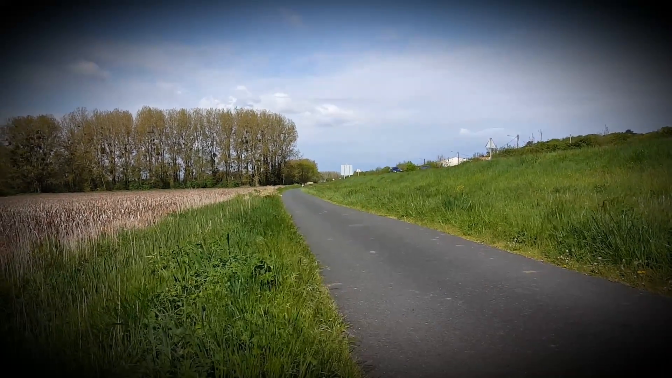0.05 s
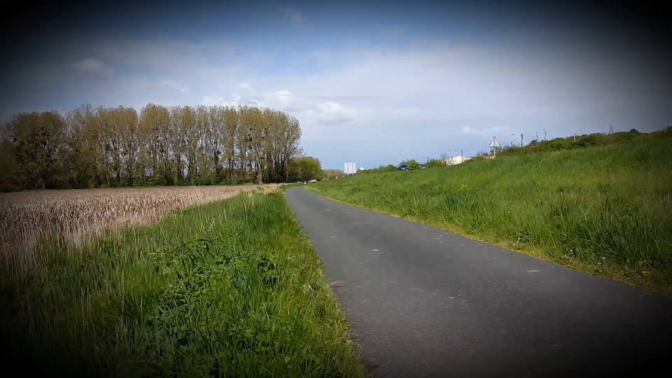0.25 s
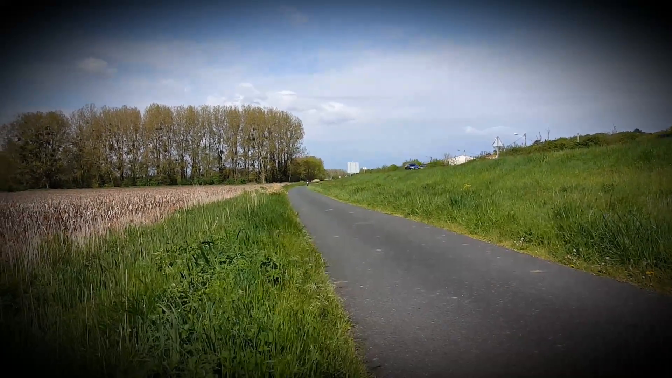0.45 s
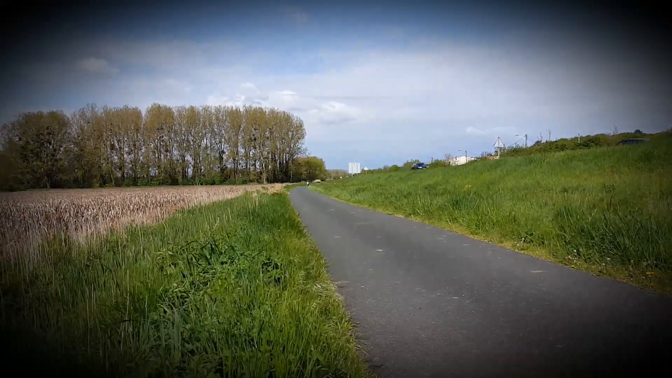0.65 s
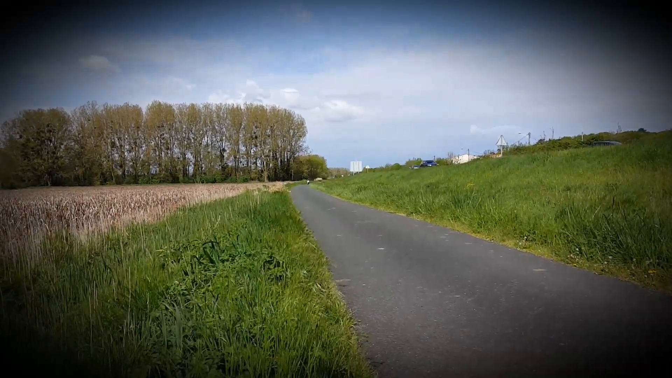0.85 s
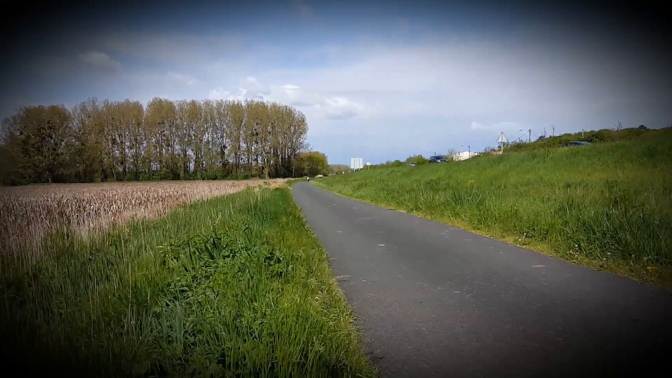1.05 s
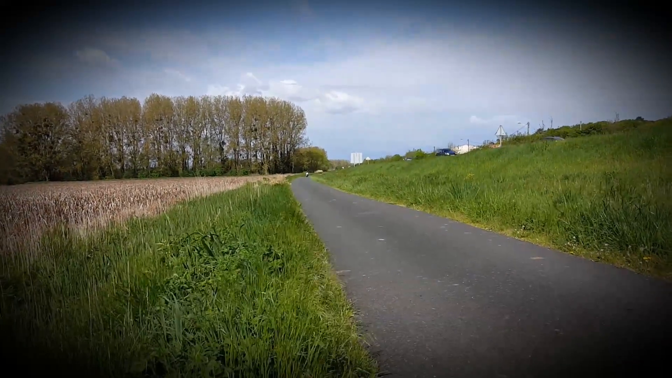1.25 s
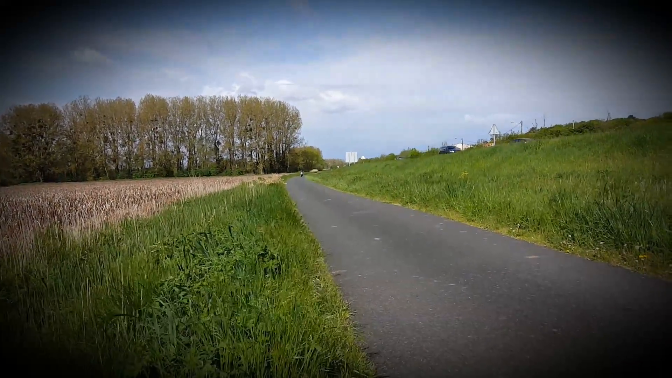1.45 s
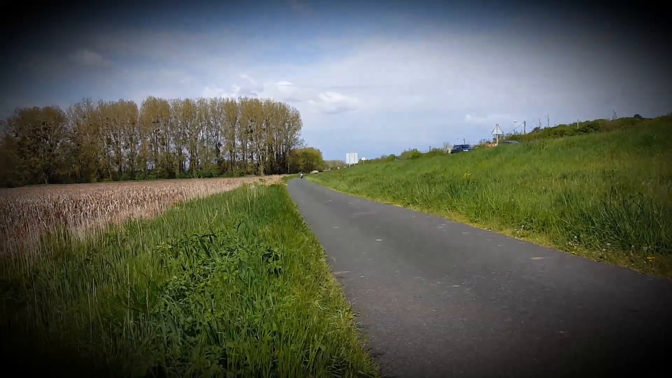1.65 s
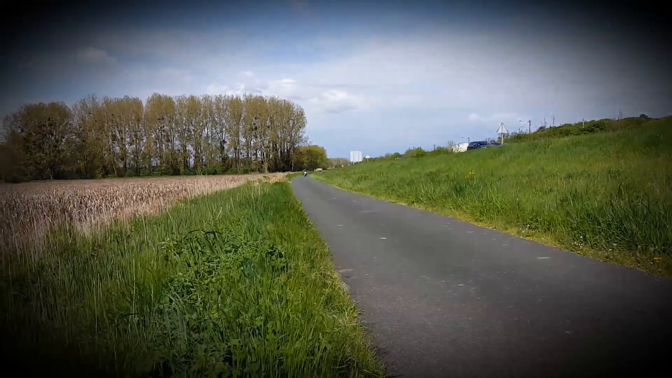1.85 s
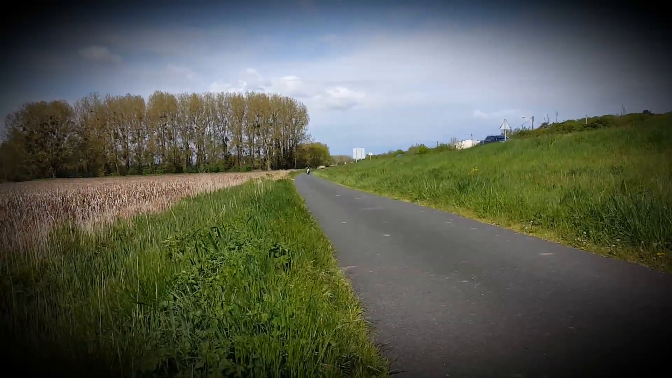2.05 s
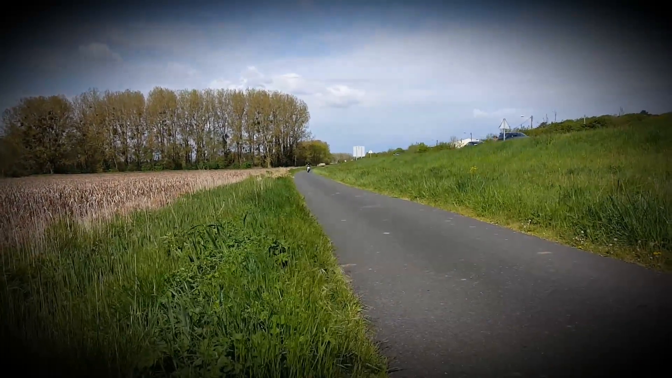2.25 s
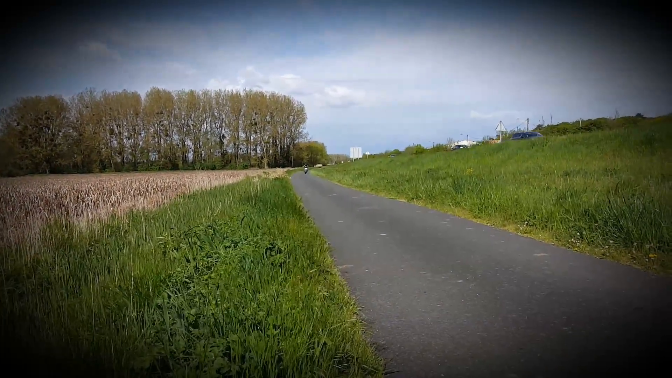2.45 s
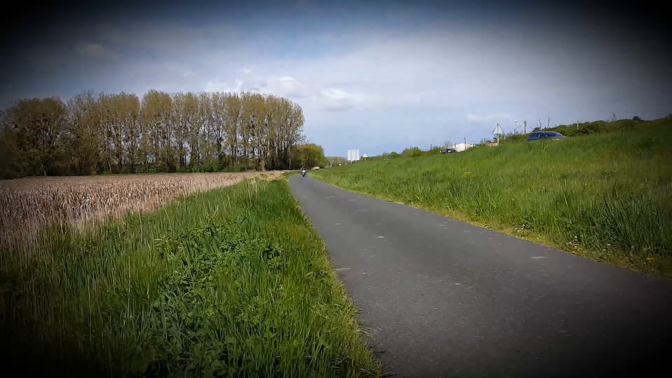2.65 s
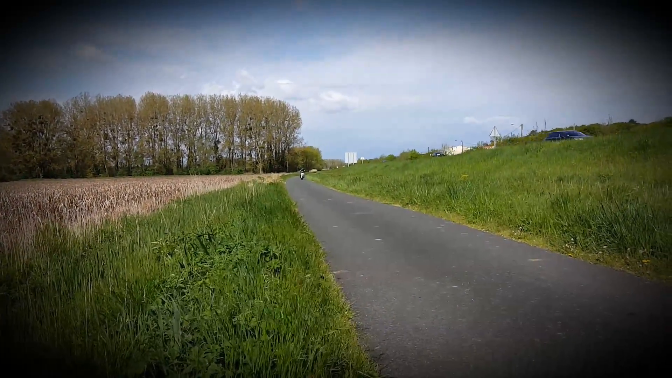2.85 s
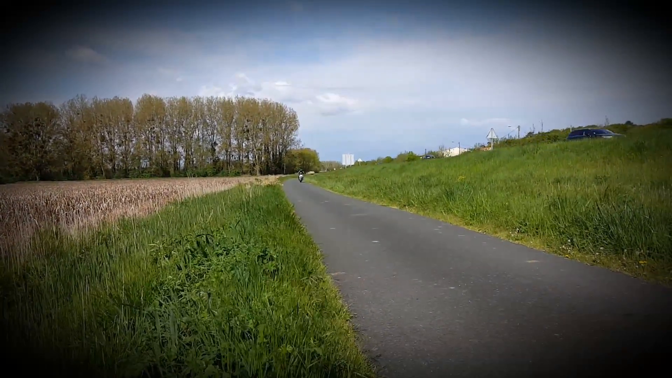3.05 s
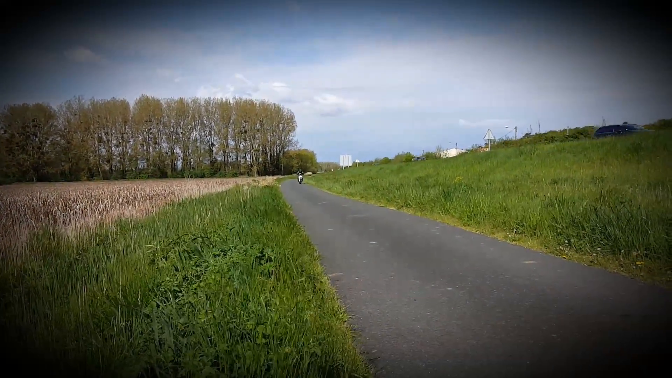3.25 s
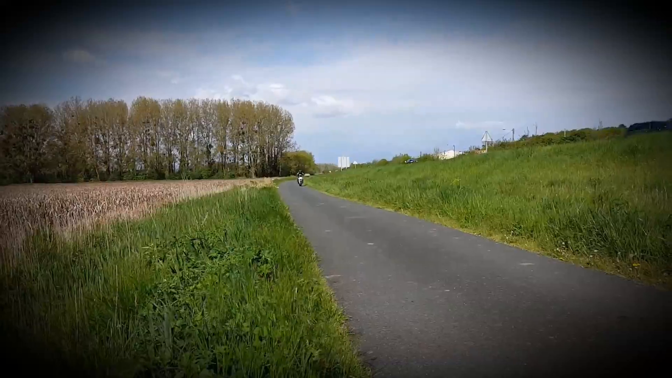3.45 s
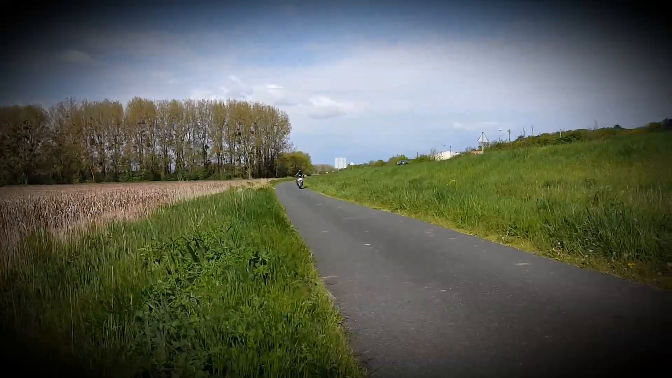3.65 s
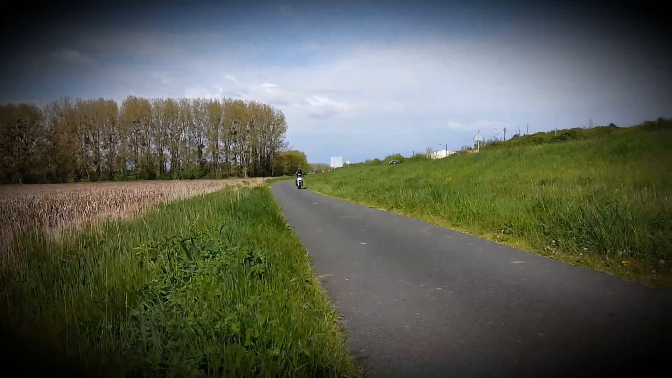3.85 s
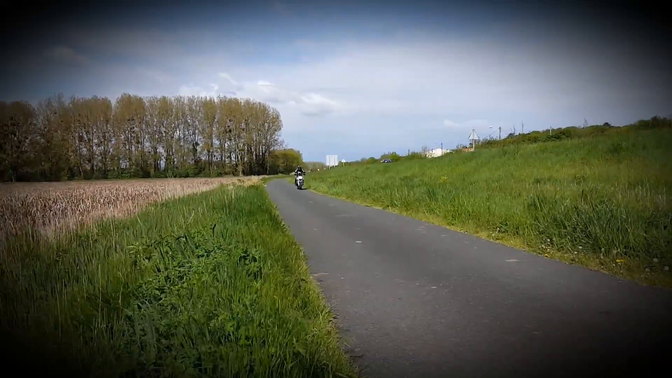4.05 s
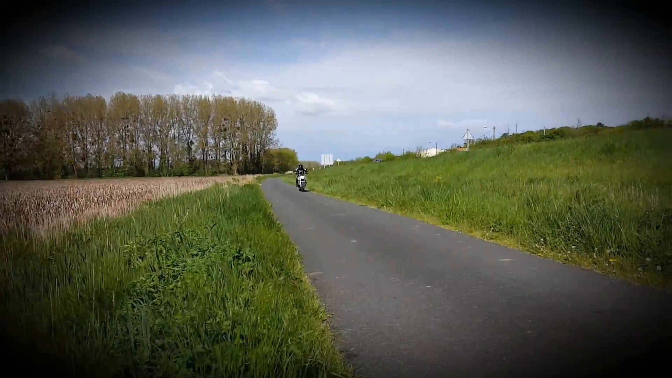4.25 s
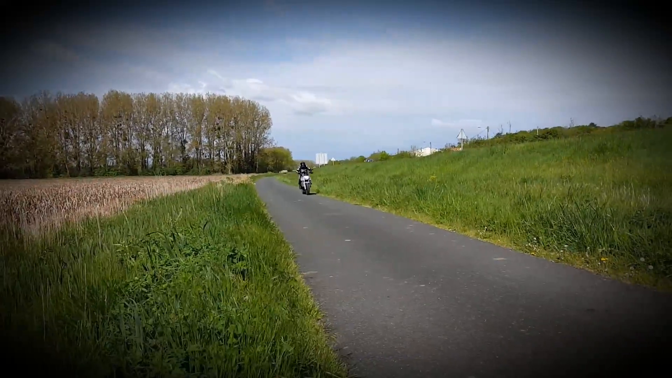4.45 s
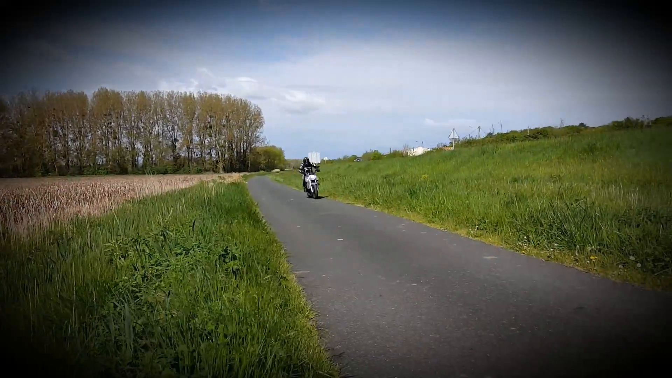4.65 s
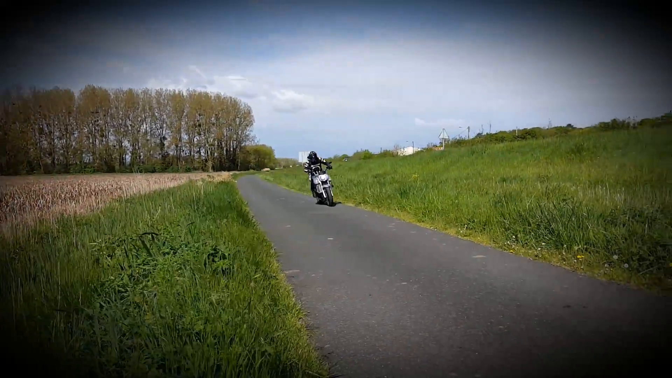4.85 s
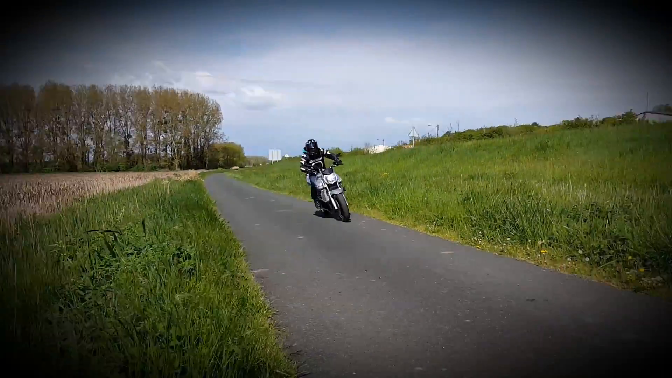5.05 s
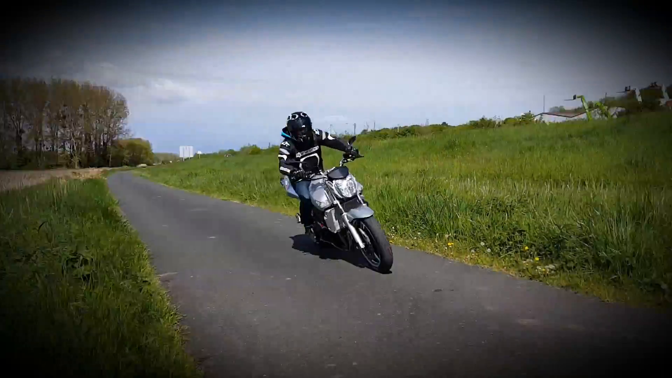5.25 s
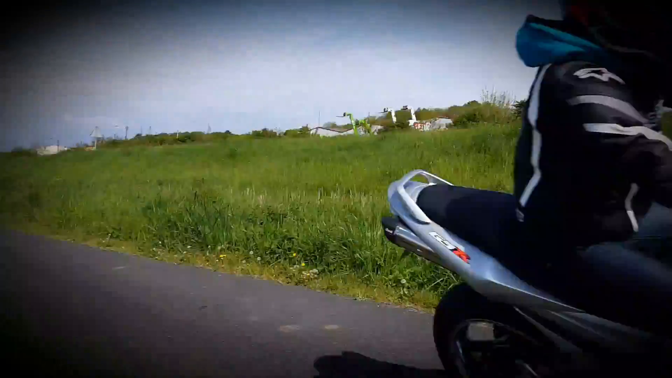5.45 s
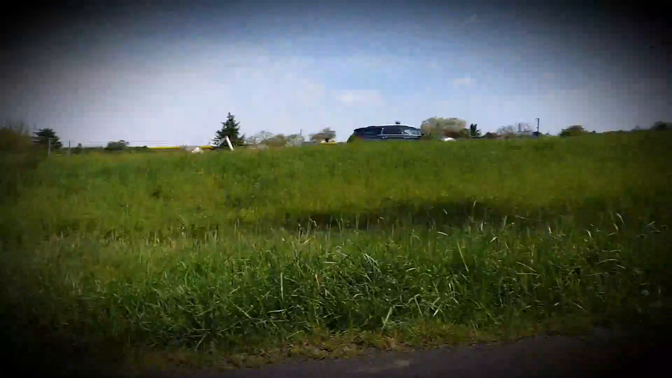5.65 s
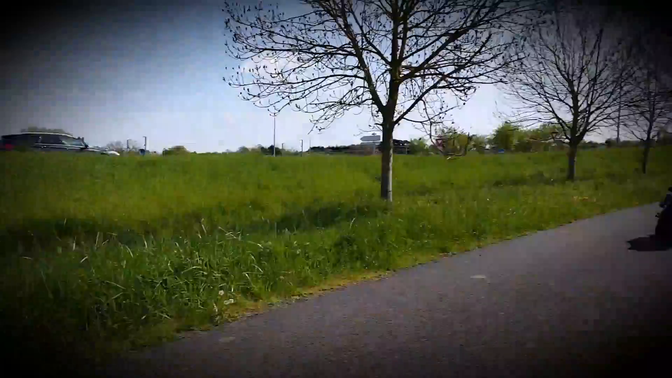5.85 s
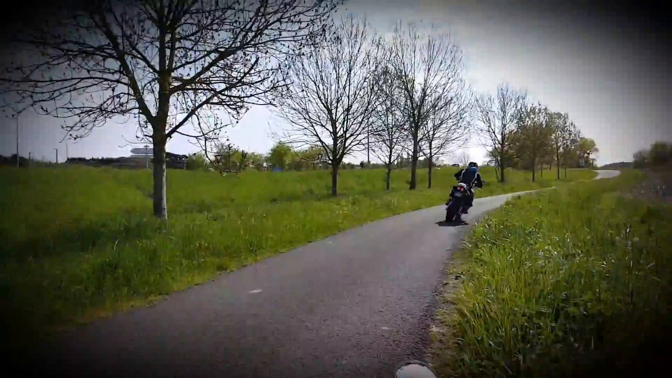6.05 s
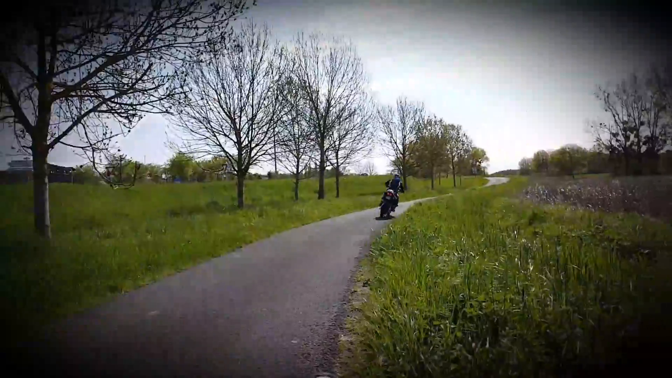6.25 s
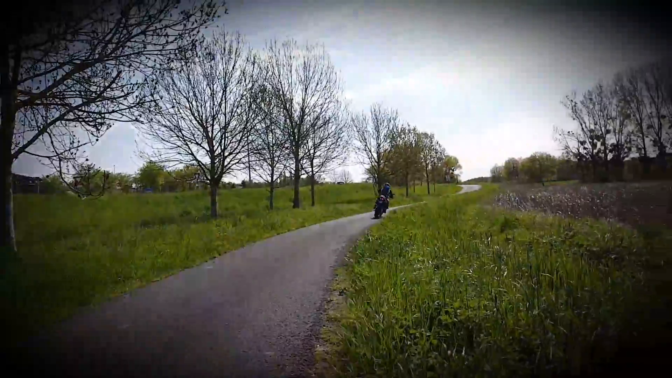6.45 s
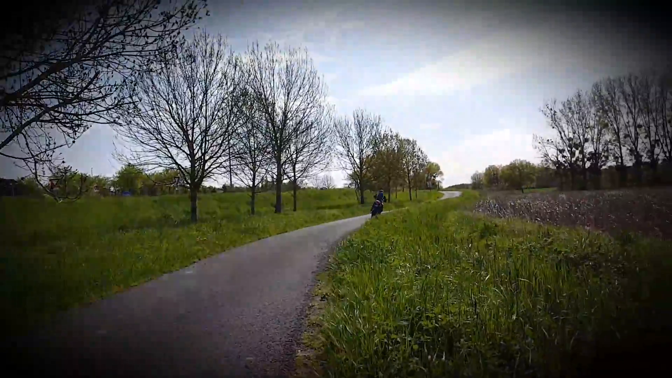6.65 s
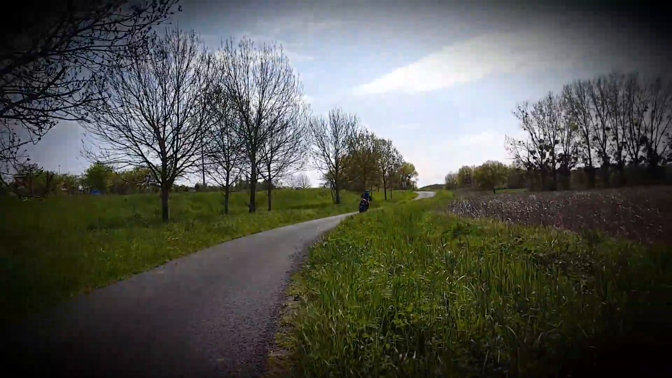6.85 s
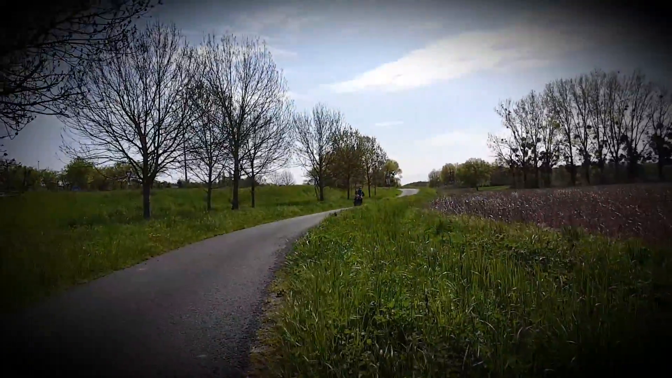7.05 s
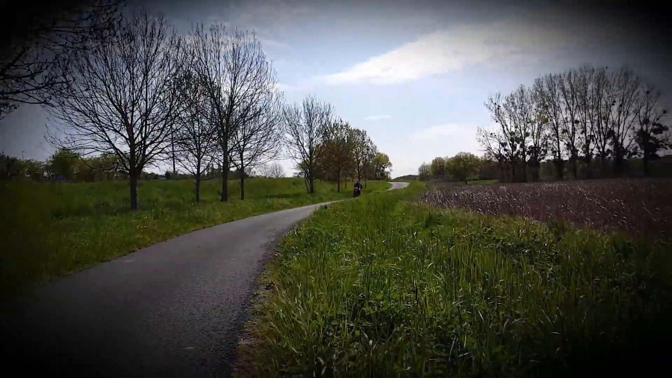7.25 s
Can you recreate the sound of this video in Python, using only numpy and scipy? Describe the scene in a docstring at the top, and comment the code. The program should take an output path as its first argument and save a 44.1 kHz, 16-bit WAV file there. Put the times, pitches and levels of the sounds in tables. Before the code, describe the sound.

Outdoors on a country lane, a camera's stereo microphone picks up faint traffic wash and irregular low wind buffets, with sharper thumps near 0.4-0.7, 1.7-2.0 and 4.1 s and a tiny tap at 0.7 s. A far four-cylinder motorcycle howls upward under full throttle from 0 to 1.3 s, blurred by tree echo. Pitch drops quickly at the upshift, pulls again from 1.5 s, then the throttle eases at 2.0 s. From 3 to 4.8 s the coasting engine nears, its tone sinking while boom, gear whine and hiss grow. Stuttering exhaust pops at 4.8-4.9 s end in one hard bang as it opens up. It roars past very close around 5.5-5.6 s with chain thrash and a snarl, pitch falling. A raspy exhaust blast follows at 5.9-6.2 s, then a receding drone; throttle closes at 6.9 s with soft pops, still humming at 7.3 s.

```python
"""A country lane: a loud four-cylinder motorcycle accelerates far off, shifts up, rolls off, opens the
throttle again, passes close to the camera and rides away, shutting off near the end.
One crankshaft angle drives the exhaust tones, rough combs of firing orders and pulsing noise bands.
A row of trees scatters an echo that counts for more when the bike is far.
Wind buffets the two microphone ports as lumpy noise, over a faint noise wash of distant traffic."""
import sys
import numpy as np
from scipy import signal
from scipy.fft import rfft, irfft, next_fast_len
from scipy.io import wavfile
from scipy.ndimage import uniform_filter1d, minimum_filter1d, map_coordinates

SR = 44100
rng = np.random.default_rng(int(sys.argv[2]) if len(sys.argv) > 2 else 0)


def persist_wave(psi):
    """Save psi, clipped to +-1, as 16-bit WAV."""
    counts = np.round(np.clip(psi, -1, 1) * 32767).astype(np.int16)
    wavfile.write(sys.argv[1], SR, np.atleast_2d(counts).T)


N = 322371
T = np.arange(N) / SR
HZ = np.fft.rfftfreq(N, 1 / SR)
CLOSEST_M = 2  # reference distance for the loudness of the bike's parts
TAIL_ON_S, TURN_S = 5.927, 0.22  # the bike turns its tail to the camera


def amp(db):
    """Decibels to gain."""
    return np.exp(np.asarray(db) * (np.log(10) / 20))


def unit(x):
    """Scales to rms 1."""
    return x / np.sqrt(np.mean(x ** 2) + 1e-20)


def curves(rows):
    """Each column of a table as a curve over the whole time."""
    s, *columns = np.transpose(rows)
    return [np.interp(T, s, column) for column in columns]


def read(points):
    """A spectrum table at every frequency, joined along a log-frequency axis."""
    hz, value = np.transpose(points)
    return np.interp(np.log(HZ + 1), np.log(hz), value)


def weigh(x, gain):
    """Filters with a gain given at every frequency."""
    size = next_fast_len(N + 4000)
    gain_here = np.interp(np.fft.rfftfreq(size, 1 / SR), HZ, gain)
    return irfft(rfft(x, size) * gain_here, size)[..., :N]


def colour(x, spectrum):
    """Gives x a spectrum, at rms 1."""
    return unit(weigh(x, amp(read(spectrum))))


def drift(rate):
    """Smooth chance of rms 1 that changes about rate times a second."""
    knots = rng.standard_normal(8192)
    return unit(np.interp(T * rate, np.arange(len(knots)), knots))


def swell(s, length):
    """A smooth bump of height 1 around time s."""
    return np.exp(-(2 * (T - s) / length) ** 2)


def ramp(s, length):
    """Rises from 0 at time s to 1 a length later."""
    return np.clip((T - s) / length, 0, 1)


def window(start, rise, until, fade):
    """Rises to 1, holds and fades."""
    return ramp(start, rise) - ramp(until, fade)


def pan(db):
    """Gains of the two ports for a left-minus-right level."""
    gains = amp([[db / 2], [-db / 2]])
    return gains / np.sqrt(np.mean(gains ** 2))


def knock(s, db, hz, decay):
    """A pressure push that swells for half the decay time, then dies away."""
    out, t = np.zeros(N), np.arange(SR // 10) / SR
    u = t / (decay / 2)
    push = amp(db) * u * np.exp(1 - u) * np.sin(2 * np.pi * hz * t)
    part = out[round(s * SR):][:len(t)]
    part += push[:len(part)]
    return out


# How alike the ports hear the roar and the traffic: (frequency [Hz], left-right likeness [-1 to 1])
PORT_LIKENESS = [(100, 1), (500, 0.89), (1000, 0.64), (2000, 0.61), (3500, 0.61), (6000, 0.45),
                 (14000, .05)]


def port_noise():
    """Noise at both ports: alike in the bass, nearly unrelated at the top of the treble."""
    shared, apart = rng.standard_normal((2, N))
    alike = np.clip(read(PORT_LIKENESS), -1, 1)
    mid = weigh(shared, np.sqrt((1 + alike) / 2))
    side = weigh(apart, np.sqrt((1 - alike) / 2))
    return np.array([mid + side, mid - side])


# Spectrum of the main road: (frequency [Hz], density [dB per Hz])
TRAFFIC_SPECTRUM = [(30, -2.5), (100, 18), (300, -20), (600, -3.5), (1000, 10.5), (1500, -8), (2300, -9),
                    (3000, -40.5), (5000, -41.5), (9000, -25), (14000, -34)]


def traffic(level_db=-54, swell_db=1.5, turned_db=-3.0):
    """The wash of a main road behind the bank, fainter once the camera has turned after the bike."""
    wash_db = level_db + swell_db * drift(0.69) + turned_db * ramp(TAIL_ON_S, TURN_S)
    return amp(wash_db) * colour(port_noise(), TRAFFIC_SPECTRUM)


# Spectrum of wind at a port: (frequency [Hz], density [dB per Hz])
BUFFET_SPECTRUM = [(20, -24), (40, -9), (70, -2), (120, 1), (200, -3), (320, -2.5), (450, -15), (700, -24),
                   (1200, -26), (3000, -46.5), (8000, -72)]
# Gusts over the breeze: (time [s], length [s], level [dB])
GUST_TIMES = [(0.445, 0.083, -25.5), (0.683, 0.16, -27.5), (0.926, 0.12, -37), (1.295, 0.12, -37.5),
              (1.71, 0.28, -32), (1.856, 0.11, -25), (2.354, 0.69, -33), (2.997, 0.21, -35.5),
              (3.557, 0.57, -29), (4.146, .1, -30), (4.75, 0.58, -28), (5.605, 0.36, -29.5),
              (6.42, 0.09, -29.5), (6.95, 0.62, -35.5)]
# Single eddies striking the ports:
# (time [s], envelope peak [dB], pitch [Hz], decay [s], left minus right [dB])
EDDY_THUMPS = [(.416, -17, 202, 0.0071, -24), (.614, -21, 273, 0.0063, 19), (0.667, -17, 199.4, 0.0021, -4),
               (0.681, -18.5, 104, 0.011, 9), (1.733, -13.5, 168, 0.0046, -26),
               (1.821, -11, 402, 0.0024, 5), (1.831, -17, 300, 0.0023, 2), (1.862, -18, 350, 0.0025, -18),
               (1.876, -16, 553, 0.0015, -22), (2.025, -25.5, 340, 0.0046, -23),
               (4.138, -11, 253, 0.0085, 28)]


def wind(breeze_db=-46, lump_db=3.0, lumps_per_s=45):
    """Gusts of lumpy turbulence over a light breeze, different at each port, with thumps of eddies."""
    gust_power = sum(amp(db) ** 2 * swell(s, length) for s, length, db in GUST_TIMES)
    strength = np.sqrt(amp(breeze_db) ** 2 + gust_power)
    ports = []
    for _ in range(2):
        lumpy = rng.standard_normal(N) * amp(lump_db * drift(lumps_per_s))
        ports.append(colour(lumpy, BUFFET_SPECTRUM))
    thumps = sum(knock(*row) * pan(side_db) for *row, side_db in EDDY_THUMPS)
    return strength * np.array(ports) + thumps


# The rider's moves from wide open; each starts at its time: (time [s], new opening [0-1])
THROTTLE_MOVES = [(1.28, 0.36), (1.5, 0.91), (2.03, 0.29), (4.89, 0.95), (6.88, 0)]


def throttle(twist_s=0.08):
    """The opening of the throttle over time; each move takes twist_s."""
    opening = np.ones(N)
    for s, new in THROTTLE_MOVES:
        opening = opening + (np.clip(new, 0, 1) - opening) * ramp(s, twist_s)
    return opening


# The ride past: (time [s], distance from the camera [m])
BIKE_DISTANCE = [(0, 126), (1.2, 66.5), (3.1, 42), (3.7, 18.8), (4.5, 12.5), (4.8, 8.4), (5.25, 4.45),
                 (5.5, 2.18), (5.6, 2.12), (5.72, 5.47), (5.95, 7.04), (6.25, 14.8), (6.85, 15),
                 (7.31, 33.5)]


def spreading_db():
    """The 1/distance change in level, against the reference distance."""
    s, metres = np.transpose(BIKE_DISTANCE)
    return -20 * np.interp(T, s, np.log10(metres / CLOSEST_M))


def tail_view():
    """How far the bike shows its tail to the camera, 0-1."""
    return (1 + np.tanh((T - TAIL_ON_S) / TURN_S)) / 2


def pipe_beam():
    """The mouth of the pipe points at the camera for a moment, 0-1."""
    return window(5.84, rise=0.086, until=6.26, fade=0.25)


def part_db(near_db, fall, open_db, behind_db, beam_db):
    """One part's level: fall is its share of the 1/distance law, open_db its gain from shut to open."""
    ride_db = near_db + fall * spreading_db() + open_db * (throttle() - 1)
    return ride_db + behind_db * tail_view() + beam_db * pipe_beam()


def treble_swell_db():
    """Hiss and fizz swell briefly on the approach."""
    return 4.8 * swell(4.03, length=0.53)


# Engine speed: (time [s], firing rate as heard [Hz])
FIRING_RATE = [(0, 281.2), (.86, 372.2), (1.14, 400.9), (1.28, 411.6), (1.35, 392.2), (1.45, 330.3),
               (2.0, 344.8), (2.14, 334.2), (2.6, 319.8), (3.0, 296.3), (3.36, 282.8), (3.52, 277),
               (3.8, 266.8), (4.1, 261.3), (4.45, 249.4), (4.85, 241.9), (5.05, 249.7), (5.14, 243.4),
               (5.47, 240.5), (5.52, 235), (5.58, 232.5), (5.64, 220), (5.7, 212.4), (5.78, 211.6),
               (5.835, 223), (5.885, 209.9), (6.1, 211.5), (6.88, 226.1), (6.95, 205.3), (7.07, 218.6),
               (7.31, 213)]


def crankshaft():
    """The firing angle that every engine sound follows, and its rate; no two firings are spaced alike."""
    hz, = curves(FIRING_RATE)
    return 2 * np.pi * np.cumsum(hz) / SR + .04 * drift(120), hz


# One overtone rings out or sinks for a moment:
# (time [s], length [s], multiple of the firing rate [ratio], change [dB])
ORDER_SWELLS = [(.08, 0.6, 2, 6.5), (1.22, 0.25, 2, -3), (0.81, 0.8, 3, 1.5), (0.803, .5, 6.5, 4),
                (1.23, .2, 5.25, 21), (1.03, 0.43, 6, 4.5), (1.0, .6, 7.5, 7), (1.2, .3, 6.5, 6),
                (1.2, .3, 7, 12), (1.744, 0.31, 6, 12), (1.801, 0.31, 5.5, 10), (1.8, .4, 6.25, 13),
                (1.8, 0.62, 7, 5.5), (2.42, 0.46, 4, 10.5), (2.48, 0.81, 6.5, 8), (2.62, 1.05, 3, 10.5),
                (1.95, .12, 3, 9), (2.37, .26, 3, 4), (.37, .18, 7, 8.5), (.95, .35, 5.5, 7),
                (3.03, 0.2, 4, 10.5), (3.081, 0.35, 8, 15), (3.37, 0.51, 3, -13), (3.84, 1.2, 2, 10.5),
                (4.554, 0.49, 4, 7), (5.13, 0.4, 2, 4.5), (.58, .28, 2, -6), (5.98, .22, 6.5, 8),
                (5.98, .22, 6, 3), (1.2, .25, 8.5, 9), (1.2, .25, 8, 7), (5.44, 0.13, 2, -8.5),
                (5.545, .08, 2, 5.5), (5.615, .03, 2, -6), (5.41, .16, 4.5, 13), (5.553, .06, 4.5, 17),
                (5.62, .05, 4.5, 17), (5.7, 0.11, 4.5, 14), (5.43, .12, 5, 6), (5.53, .05, 5, 11.5),
                (5.61, 0.071, 5, 12.5), (6.15, 0.18, 4.5, 4.5), (6.2, .3, 5, 4), (5.682, 0.07, 5, 17),
                (5.69, 0.12, 2, 6.5), (5.82, 0.0695, 2, -7), (4.8, .25, 1.5, 4.5), (5.634, 0.082, 1.5, 13),
                (5.722, 0.17, 2.5, 16), (5.774, 0.23, 3, 18.5), (5.978, 0.23, 1.5, 9), (6.495, .3, 2, 5.5),
                (6.62, .42, 3, 5.5), (6.64, 0.46, 4, 3.5), (3.9, 1, 3, 2.5)]


def order_swell_db(order):
    """The dB by which one overtone rings out or sinks over time."""
    change_db = 0
    for s, length, which, db in ORDER_SWELLS:
        if round(4 * which) == 4 * order:
            change_db = change_db + db * np.exp(-(2 * (T - s) / length) ** 4)  # flat-topped bump
    return change_db


# The exhaust's booming fundamental, before dips and flutter: (time [s], level [dB])
BOOM_LEVEL = [(0, -42), (.55, -35), (1.08, -31), (1.42, -35), (2.05, -40.5), (2.3, -34.5), (2.7, -31.5),
              (3.3, -23), (3.55, -23.5), (4.0, -18), (4.45, -10), (4.75, -10.5), (4.89, -12), (4.97, -14),
              (5.33, -8), (5.6, -14), (5.83, -10), (5.95, -15.5), (6.38, -17), (6.75, -10), (6.88, -11),
              (7.15, -12.5), (7.31, -14.5)]
# The boom drops out briefly: (time [s], length [s], depth [dB])
BOOM_DIPS = [(2.88, .04, 5), (0.407, 0.055, 15), (0.69, 0.11, 11), (0.937, 0.071, 6.5), (1.315, 0.058, 7),
             (1.493, 0.052, 10), (1.7, 0.11, 6), (2.11, 0.082, 9), (3.458, 0.11, 5.5), (3.879, 0.015, 13.5),
             (4.144, 0.017, 9.5), (4.777, 0.032, 6.5), (4.807, .032, 14), (4.829, .015, 14.5),
             (4.858, .008, 9), (4.873, 0.011, 16), (4.914, .01, 9), (4.938, .04, 5), (5.199, 0.0056, 21),
             (5.544, 0.053, 5), (6.926, 0.041, 12), (7.021, .03, 4.5), (7.226, .05, 3.5)]
# Resonances of the pipe: (frequency [Hz], gain [dB])
PIPE_RESONANCES = [(330, 4), (430, -1), (520, -4.5), (640, -14), (760, -5.5), (930, 6), (1080, -3.5),
                   (1250, -2.5), (1600, -10.5), (1930, -12), (2030, 0)]
# Exhaust overtones; unequal cylinders give the half orders:
# (multiple of the firing rate [ratio], level [dB], share that follows the boom and not the bark [0-1],
#  gain from shut to open throttle [dB], gain in the beam of the pipe [dB])
EXHAUST_OVERTONES = [(1.5, -19.5, 0.44, -12, 2), (2, -3.5, 0.61, 18, 2), (2.5, -12.5, 0.13, 1.5, 15.5),
                     (3, -15, 0.77, 14, 6.5), (4, -11, 0.16, 1.5, 7), (4.5, -8.5, 0, 3.5, 5),
                     (5, -8.5, 0, -3, 8), (6, -14.5, 0, 4.5, 6.5)]


def drone(angle, hz, bark_db):
    """The clean exhaust lines; the boom flutters most when far, and an open throttle steadies it."""
    opening = throttle()
    boom_db, = curves(BOOM_LEVEL)
    flutter_db = np.interp(T, [2.5, 4.1], [2.0, .55]) * (1 - 0.6 * opening)
    dip_db = sum(db * swell(s, length) for s, length, db in BOOM_DIPS)
    # the engine misfires just before the throttle reopens
    stutter_db = 2.5 * window(4.76, rise=.005, until=4.93, fade=0.11) * drift(130)
    out = amp(boom_db - dip_db + stutter_db + flutter_db * drift(45)) * np.cos(angle)
    pipe_db = read(PIPE_RESONANCES)
    for multiple, db, share, open_db, beam_db in EXHAUST_OVERTONES:
        order = round(2 * multiple) / 2
        level_db = db + share * boom_db + (1 - share) * bark_db + open_db * (opening - 1)
        level_db = level_db + np.interp(order * hz, HZ, pipe_db) + beam_db * pipe_beam()
        chance_db = 1.75 * drift(30) + 1.4 * drift(7)
        phase = 2 * np.pi * rng.random()
        out += amp(level_db + order_swell_db(order) + chance_db) * np.cos(order * angle + phase)
    return np.sqrt(2) * out


def rasp(angle, half_db, quarter_db, fading_db, count):
    """The four-firing cycle makes a comb of quarter orders, each fading in and out by chance."""
    pattern_db = [0, quarter_db, half_db, quarter_db]
    clean_orders = [1] + [round(2 * row[0]) / 2 for row in EXHAUST_OVERTONES]
    out = np.zeros(N)
    for k in range(2, count):
        order = k / len(pattern_db)
        if order not in clean_orders:
            level_db = pattern_db[k % len(pattern_db)] + order_swell_db(order) + fading_db * drift(6)
            out += amp(level_db) * np.cos(order * angle + 2 * np.pi * rng.random())
    return out


def roar(angle, lines, spectrum, level_db, tonal, throb, flicker_db):
    """One engine band: firing lines (power share tonal) plus turbulence that puffs with the crank."""
    tonal = np.clip(tonal, 0, 1)
    # each firing, each pair of firings and each cycle of four
    pulse = np.cos(angle) + 0.38 * np.cos(angle / 2) + .5 * np.cos(angle / 4)
    puffs = np.exp(throb * pulse)
    noise = colour(port_noise() * puffs * amp(flicker_db * drift(70)), spectrum)
    return amp(level_db) * (np.sqrt(tonal) * lines + np.sqrt(1 - tonal) * noise)


# Throb of each crank turn: (frequency [Hz], density [dB per Hz])
RUMBLE_SPECTRUM = [(50, -26), (85, -7.5), (120, 0), (160, 4), (220, -15.5), (400, -43)]


def rumble(angle):
    """The low throb of each crank turn, at half the firing rate, in turbulent noise."""
    level_db = part_db(near_db=-30, fall=0.7, open_db=2, behind_db=1, beam_db=-3.5)
    turns = unit(np.cos(angle / 2))
    return roar(angle, turns, RUMBLE_SPECTRUM, level_db, 0.12, throb=0.18, flicker_db=0.5)


# Rough middle of the exhaust: (frequency [Hz], density [dB per Hz])
BARK_SPECTRUM = [(60, -36), (115, -13.5), (170, -3), (300, 6.5), (480, -2), (650, -6.5), (820, -3),
                 (980, 1), (1150, -3.5), (1320, -7.5), (1600, -21.5), (4000, -64)]


def bark(angle, comb, level_db):
    """The exhaust's rough middle, more tonal from behind on an open throttle."""
    front, rear = .36, .74  # tonal shares
    tonal = front + (rear - front) * tail_view() * throttle()
    lines = colour(comb, BARK_SPECTRUM)
    return roar(angle, lines, BARK_SPECTRUM, level_db, tonal, throb=0.29, flicker_db=1.5)


# Noise of the clatter: (frequency [Hz], density [dB per Hz])
CLATTER_SPECTRUM = [(600, -42.5), (1100, -2), (1450, 3.5), (1750, -1), (2100, 0.5), (2400, 0.5),
                    (2650, -14), (2950, -11.5), (3400, -12), (4500, -18), (7000, -48.5)]
# The intake rings near 2 kHz: (frequency [Hz], gain [dB])
INTAKE_RING = [(1000, -20), (1350, -4), (1600, -6), (1850, -1), (2100, 1), (2380, -1.5), (2650, -13),
               (2950, -14), (3400, -20), (4000, -25), (4500, -16), (5200, -40)]


def clatter(angle, intake):
    """Firing orders ring in the intake amid rough noise; a closing throttle makes them less tonal."""
    level_db = part_db(near_db=-18, fall=1.0, open_db=2.5, behind_db=-11.5, beam_db=2)
    tonal = np.interp(spreading_db(), [-27, -20], [.52, .44]) * np.sqrt(np.clip(throttle(), 0, 1))
    lines = colour(intake, INTAKE_RING)
    return roar(angle, lines, CLATTER_SPECTRUM, level_db, tonal, throb=0.2, flicker_db=1.64) * pan(2.5)


# Treble turbulence: (frequency [Hz], density [dB per Hz])
HISS_SPECTRUM = [(1500, -18.5), (3200, 0), (4000, -5), (4900, -3), (5900, 0), (7200, -9.5), (9000, -24.5),
                 (14500, -49)]


def hiss(angle):
    """Treble turbulence that pulses gently with the firings."""
    level_db = part_db(near_db=-28.5, fall=1.3, open_db=5, behind_db=2.5, beam_db=2.5)
    level_db = level_db + treble_swell_db()
    return roar(angle, 0, HISS_SPECTRUM, level_db, 0, throb=0.14, flicker_db=1.0) * pan(-1.5)


def fainter_top(x, db_per_m=0.55, edge_hz=10900):
    """The highest treble is heard when the bike is near and is fainter far off."""
    top = weigh(x, np.clip((HZ - edge_hz) / 1500, 0, 1))
    metres = CLOSEST_M / amp(spreading_db())
    return x - top + top * amp(-db_per_m * metres)


# The top of the hiss: (frequency [Hz], density [dB per Hz])
FIZZ_SPECTRUM = [(5000, -26), (7400, -4), (9200, 1.5), (10800, -4.5), (12500, -4), (14500, -8)]


def fizz(angle):
    """The top of the hiss, heard when the bike is near and fainter far off."""
    level_db = part_db(near_db=-26, fall=1.5, open_db=8, behind_db=2.5, beam_db=3)
    level_db = level_db + treble_swell_db()
    return fainter_top(roar(angle, 0, FIZZ_SPECTRUM, level_db, 0, throb=0.13, flicker_db=1.0))


# The row of trees as a reflector: (frequency [Hz], gain [dB])
TREE_REFLECTION = [(250, -20), (500, -10), (850, 0.5), (2500, 3), (5000, -10)]


def trees(x, echo_db=-8, t60=1.0, full_at_m=60):
    """A scattered echo with a decaying noise tail; its share grows with distance up to full_at_m."""
    t = np.arange(SR // 2) / SR
    tails = rng.standard_normal((2, len(t))) * (1 - np.exp(-t / .05)) * amp(-60 * t / t60)
    share = np.minimum(CLOSEST_M / amp(spreading_db()) / full_at_m, 1)
    sent = weigh(x.mean(0) * share, amp(echo_db + read(TREE_REFLECTION)))
    return signal.fftconvolve(sent[None], tails / np.linalg.norm(tails[0]), axes=1)[:, :N]


# Resonances of the engine's casing: (frequency [Hz], gain [dB])
CASING_RESONANCES = [(2600, -22), (2860, -1.5), (3050, -13.5), (3550, -18), (3750, -4.5), (4050, -20),
                     (4450, 0), (4900, -20), (5350, -7.5), (5750, -10.5), (6300, -28)]


def casing(angle, level_db=-68.5, fading_db=3.5):
    """While the bike is far, high half orders glide faintly through the resonances of the casing."""
    lines = np.zeros(N)
    for k in range(13, 40):
        phase = 2 * np.pi * rng.random()
        lines += amp(fading_db * drift(6)) * np.cos(k / 2 * angle + phase)
    heard = window(.35, rise=.9, until=3.0, fade=.8)
    return amp(level_db) * colour(lines, CASING_RESONANCES) * heard


# Something small touches the camera: (time [s], envelope peak [dB], pitch [Hz], decay [s])
CAMERA_TAPS = [(0.729, -20, 795, 0.00064)]


def taps():
    """Something small taps the camera: a tiny, quickly damped push."""
    return sum(knock(*row) for row in CAMERA_TAPS)


# Gear whine: (multiple of the firing rate [ratio], level [dB])
GEAR_MESH = [(5.2, 2), (8.5, -13)]


def gears(angle, flutter_db=3.0):
    """Meshing teeth sing at fixed multiples of engine speed while the wheel drives the engine."""
    level_db = part_db(near_db=-21.5, fall=1.46, open_db=-3, behind_db=-2, beam_db=0)
    overrun = window(3.15, rise=.08, until=4.95, fade=.08)
    whine = sum(amp(level_db + db + flutter_db * drift(25)) * np.cos(order * angle)
                for order, db in GEAR_MESH)
    return np.sqrt(2) * overrun * whine


# Bangs in the exhaust: (time [s], envelope peak [dB], pitch [Hz], decay [s])
EXHAUST_BANGS = [(4.821, -15, 330, 0.003), (4.841, -13, 278, 0.008), (4.861, -11, 315, 0.006),
                 (4.904, -7.5, 330, 0.0034), (4.922, 0.5, 304, 0.004), (6.933, -18.5, 145.1, 0.016),
                 (6.999, -21.5, 280, 0.01), (7.03, -21, 288, 0.0094)]


def bangs():
    """Bangs in the exhaust, each a short damped push."""
    return sum(knock(*row) for row in EXHAUST_BANGS)


# Chain and engine side: (frequency [Hz], density [dB per Hz])
THRASH_SPECTRUM = [(1000, -33), (1500, 5), (2000, -7), (2450, -9), (2750, 0), (3150, -11), (4200, -18)]


def thrash(angle, intake):
    """Chain and engine side thrash while the bike is broadside: firing orders in pulsing noise."""
    level_db = part_db(near_db=-32, fall=0.9, open_db=5, behind_db=-2, beam_db=0)
    lines = colour(intake, THRASH_SPECTRUM)
    broadside = window(5.25, rise=.2, until=5.79, fade=.04)
    return broadside * roar(angle, lines, THRASH_SPECTRUM, level_db, .45, throb=.8, flicker_db=3)


# The silencer going by: (frequency [Hz], density [dB per Hz])
SNARL_SPECTRUM = [(700, -35), (900, -13), (1030, 0), (1190, 8), (1350, -19), (1700, -33)]


def snarl(angle, comb):
    """The silencer snarls as it goes by: a brief, mostly tonal band of firing orders."""
    lines = colour(comb, SNARL_SPECTRUM)
    passing = swell(5.59, length=.19)
    return passing * roar(angle, lines, SNARL_SPECTRUM, -29, .93, throb=.4, flicker_db=2)


# The band that the road's reflection cancels: (time [s], centre [Hz])
ROAD_NOTCH = [(5.78, 1000), (5.83, 1280), (5.87, 1620), (5.92, 1750)]


def over_ground(x, width_hz=650, depth=.9):
    """The reflection off the road cancels one band, which climbs as the bike draws away."""
    hz, = curves(ROAD_NOTCH)
    turn = np.exp(2j * np.pi * np.cumsum(hz) / SR)
    r = np.exp(-np.pi * width_hz / SR)
    # shift the band to zero, smooth it, shift it back
    band = 2 * (turn * signal.lfilter([1 - r], [1, -r], x / turn)).real
    return x - depth * window(5.79, rise=0.055, until=5.87, fade=.04) * band


# The bike's bearing: (time [s], delay of the left port against the right [ms])
PORT_DELAY = [(0, -.02), (5.5, -.02), (5.56, .07), (5.62, .27), (5.67, .41), (5.85, .42), (6, .26),
              (6.25, .08), (6.5, .02), (6.7, -.08), (7.31, -.05)]


def at_ports(bike):
    """The bike's bearing delays its sound at one port against the other."""
    lag = curves(PORT_DELAY)[0] * SR / 1000  # samples
    ports = []
    for port, sign in zip(bike, (-1, 1)):
        heard_from = np.arange(N) + sign * lag / 2
        ports.append(map_coordinates(port, [heard_from], order=3, mode="nearest"))
    return np.array(ports)


def motorcycle():
    """All engine tones and puffs turn with one crankshaft; the mix reaches the ports and the trees."""
    angle, hz = crankshaft()
    bark_db = part_db(near_db=-19.5, fall=0.816, open_db=7, behind_db=-8.5, beam_db=6)
    comb = rasp(angle, half_db=-1, quarter_db=-6.5, fading_db=2.8, count=28)
    intake = rasp(angle, half_db=-1, quarter_db=-11, fading_db=3.5, count=52)
    exhaust = drone(angle, hz, bark_db) + bangs() + bark(angle, comb, bark_db) + snarl(angle, comb)
    engine = rumble(angle) + clatter(angle, intake) + thrash(angle, intake)
    engine = engine + gears(angle) + casing(angle)
    bike = over_ground(exhaust + engine + hiss(angle) + fizz(angle))
    return at_ports(bike) + trees(bike)


def scene():
    """The countryside, the wind, the bike and a tap on the camera."""
    return traffic() + wind() + motorcycle() + taps()


def record(dry):
    """A quick limiter holds the highest peaks on both ports; then the camera's band limit."""
    allowed = np.minimum(1, .9 / (abs(dry).max(0) + 1e-9))
    gain = uniform_filter1d(minimum_filter1d(allowed, size=129), size=129)
    low_pass = signal.firwin(1023, 14560, window=("kaiser", 9), fs=SR)
    return signal.oaconvolve(dry * gain, low_pass[None], "same")


dry = scene()
out = record(dry)
persist_wave(out)
```